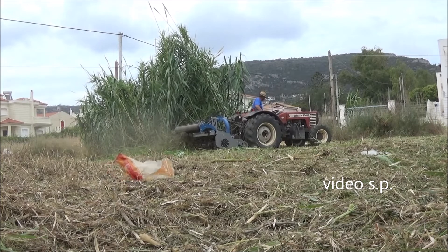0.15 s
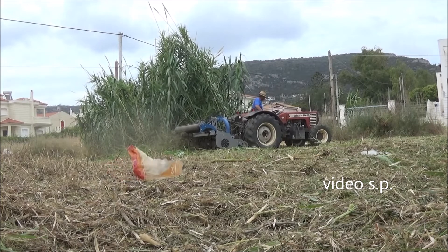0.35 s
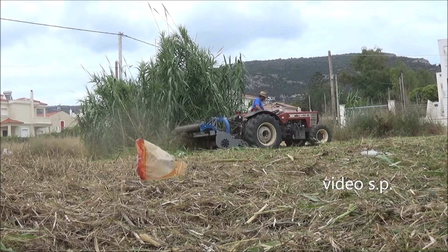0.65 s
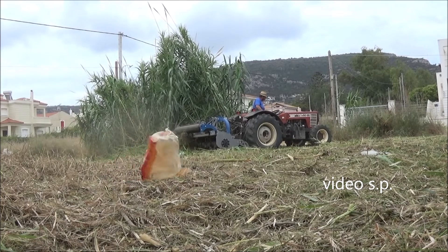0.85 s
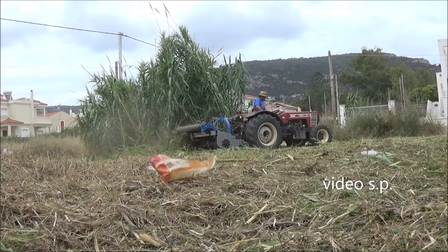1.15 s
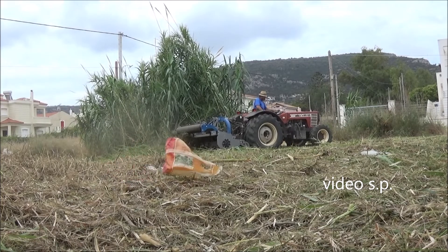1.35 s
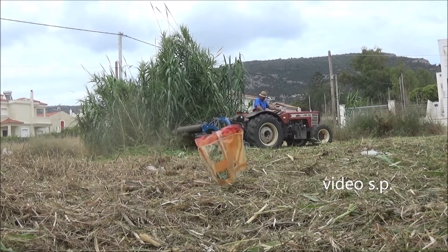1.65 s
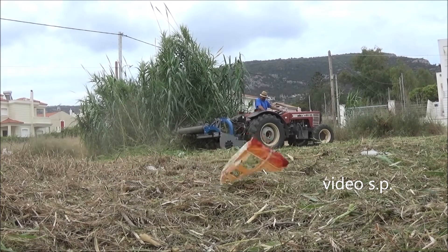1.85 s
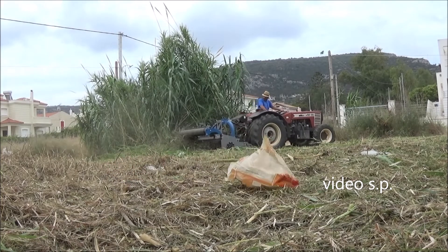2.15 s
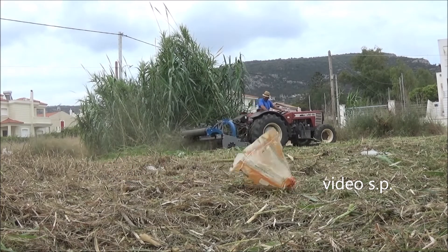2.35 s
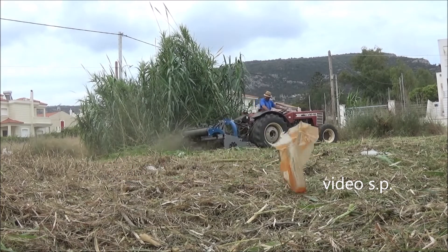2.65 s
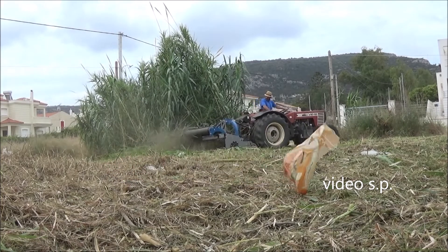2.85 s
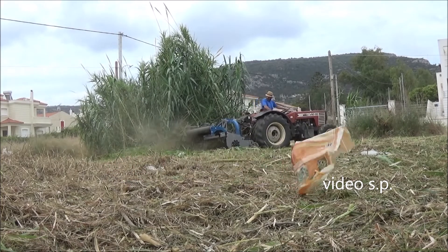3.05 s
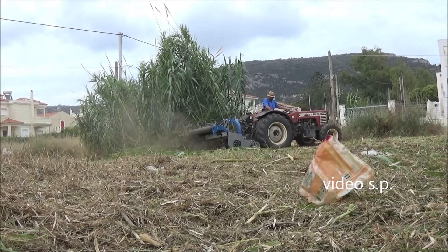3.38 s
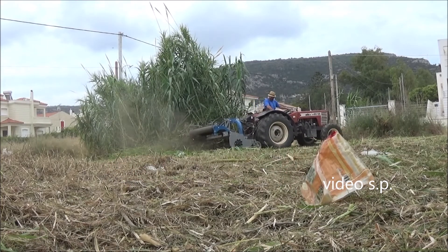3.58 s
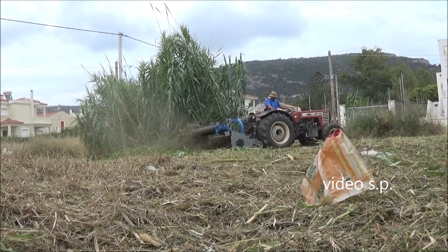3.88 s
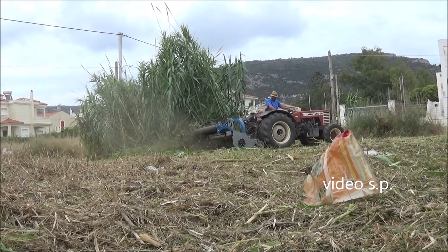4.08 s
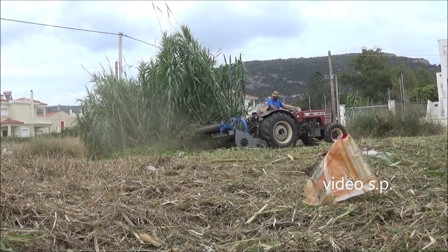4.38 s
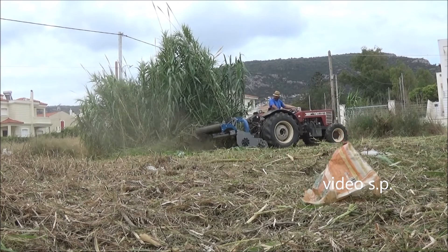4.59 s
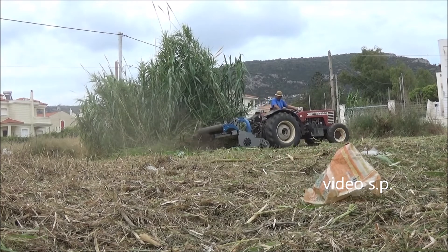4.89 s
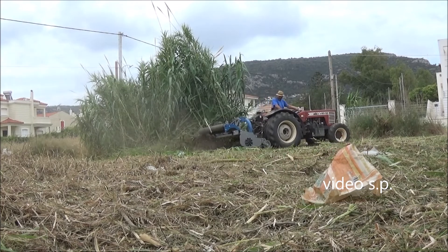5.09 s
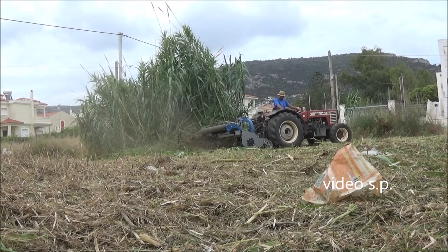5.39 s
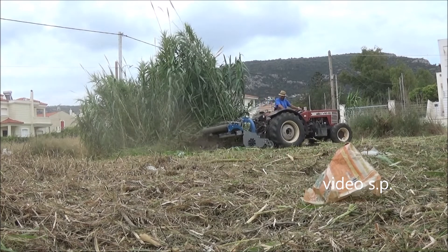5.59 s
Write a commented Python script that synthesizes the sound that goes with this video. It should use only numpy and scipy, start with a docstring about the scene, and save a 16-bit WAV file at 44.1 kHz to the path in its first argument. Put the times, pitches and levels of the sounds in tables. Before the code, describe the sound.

A tractor-driven mulcher shreds reeds with a bright, dense hiss and sharp cracks over a low diesel rumble outdoors.

```python
"""Reeds tick, swish and crack in a flail mulcher, over the rumble of a diesel tractor across an open field.
Half empty, the rotor ticks once a turn and sweeps through a few stalks; then it bites in, the engine sags
and countless snapping fibres merge into a bright hiss. Thick canes crack, hollow stalks resonate, and the
exhaust puffs with each firing. The camera's limiter ducks after the hardest cracks."""
import sys
import numpy as np
from scipy import signal
from scipy.fft import rfft, irfft
from scipy.io import wavfile
from scipy.ndimage import uniform_filter1d, minimum_filter1d

SR = 44100
rng = np.random.default_rng(int(sys.argv[2]) if len(sys.argv) > 2 else 0)


def transcribe(signal):
    """Save signal, clipped to [-1, 1], as a 16-bit WAV file at the path in sys.argv[1]."""
    frames = np.atleast_2d(signal).T
    limited = np.clip(frames, -1, 1)
    pcm = np.round(limited * 32767).astype(np.int16)
    wavfile.write(sys.argv[1], SR, pcm)


N = 252693
TIME = np.arange(N) / SR

# spectrum of a dry splinter: frequency_hz, gain_db
SPLINTER_SPECTRUM = [(1500, -42.5), (3000, -14.5), (5000, -9.5), (9500, 3), (13000, -4), (15800, -19.5)]


def mulcher(turns):
    """Amplitude modulation: flails shred leaves and stems in surges that follow the rotor."""
    # the cut swells with each clump of reeds: time_s, leaf_level_db, stem_level_db
    cut_levels = [(0.0, -17.0, -29), (0.55, -18, -28.5), (0.95, -19, -27.0), (1.4, -19.5, -26.5),
                  (1.72, -16.5, -27.0), (1.85, -9, -27), (2.15, -12.5, -29), (2.6, -13, -28.5),
                  (2.92, -13.5, -29.5), (3.1, -15.5, -31.5), (3.45, -13.5, -29.0), (4.05, -12.5, -30.0),
                  (4.24, -14.5, -34), (4.4, -12.5, -29.5), (4.75, -12, -29.5), (4.97, -14.0, -34.5),
                  (5.2, -13.5, -29.5), (5.73, -12.5, -33.0)]
    leaf_db, stem_db = curves(cut_levels)
    filling_s, full_s = 1.35, 1.9
    emptiness = np.clip((full_s - TIME) / (full_s - filling_s), 0, 1)
    # a half-empty rotor swishes every second turn, throbs every turn and lets splinters stand out
    swish_db = 8.5 * emptiness * bump(turns, centre=1.13, width=0.11, period=2)
    throb_db = 2 * emptiness * np.cos(2 * np.pi * (turns - 0.68))
    crackle_db = -10 + 2 * emptiness
    surge = undb(swish_db + throb_db) * bites(per_second=110, decay_s=0.0064, depth=1.63)
    leaves = undb(leaf_db + 0.18) * shredded_leaves(surge)
    stems = undb(stem_db + 5.5) * crunched_stems(surge)
    splinters = unit(colour(snaps(per_second=600, spread_db=1.55), SPLINTER_SPECTRUM))
    crackle = undb(leaf_db + crackle_db) * splinters
    return leaves + stems + crackle + flail_tick(turns) + undb(5) * hood_knocks()


def shredded_leaves(surge):
    """Shot noise: tearing leaves click and fuse into hiss, flickering independently in three bands."""
    # spectrum of tearing leaves: frequency_hz, gain_db
    leaf_spectrum = [(1500, -32.5), (3000, -11), (4200, -5), (4650, -8), (5100, -3), (5350, -6), (5650, -3),
                     (6200, -4.5), (6900, -6), (7800, -2.5), (9300, 1), (10500, -2), (12300, -7),
                     (15800, -20)]
    hiss = 0
    for band_hz in [(1500, 6800), (6800, 10500), (10500, 17000)]:
        fibres = snaps(per_second=19000, spread_db=3)
        envelope = steady(surge * bites(per_second=200, decay_s=0.0035, depth=1.3))
        band = signal.butter(4, band_hz, "band", fs=SR, output="sos")
        hiss += signal.sosfilt(band, fibres * envelope)
    return unit(colour(hiss, leaf_spectrum))


def crunched_stems(surge):
    """Filtered impulses: splitting stems crunch below the hiss and follow the surges more weakly."""
    # spectrum of splitting stems: frequency_hz, gain_db
    stem_spectrum = [(500, -26), (850, -16.5), (1100, -9), (1400, -4), (1950, 1), (2400, -1), (3000, 1),
                     (4000, -4), (5500, -4), (9000, -23)]
    splits = snaps(per_second=8000, spread_db=1.5)
    envelope = steady(surge ** 0.31 * bites(per_second=190, decay_s=0.0039, depth=1))
    return unit(colour(splits * envelope, stem_spectrum))


def flail_tick(turns):
    """Periodic impact: one flail ticks on every turn, growing louder until the reeds muffle it."""
    peak_s, rise_db_per_s, fall_db_per_s = 0.65, 19, 26
    strike_turns, decay_turns = 0.85, 0.041
    age = TIME - peak_s
    level_db = -3 + np.minimum(rise_db_per_s * age, -fall_db_per_s * age)
    since_strike = (turns - strike_turns) % 1
    tick = unit(noise(SPLINTER_SPECTRUM)) * np.exp(-since_strike / decay_turns)
    return undb(level_db + walk(26.6)) * tick


def hood_knocks():
    """Impact resonance: the half-empty rotor slaps canes against the hood; it rings and splinters spray."""
    # slaps in step with the rotor: time_s, relative_peak_db
    slaps = [(0.5057, -16), (0.7791, -22), (0.853, -13), (1.1478, -10), (1.2171, -12), (1.2965, -9),
             (1.3667, -10), (1.4414, -18), (1.5918, -13), (1.6611, -15), (1.7345, -13)]
    hood_hz, width_s = 3160, 0.0033
    hood = signal.iirpeak(hood_hz, Q=3.3, fs=SR)
    impacts = snaps(per_second=8400, spread_db=0)
    ring = unit(signal.lfilter(*hood, signal.lfilter(*hood, impacts)))
    spray = undb(-1.5) * unit(noise(SPLINTER_SPECTRUM))
    sound = 0
    for time_s, peak_db in slaps:
        knock = (ring + spray) * np.exp(-0.5 * ((TIME - time_s) / width_s) ** 2)
        sound += undb(peak_db) * knock / np.abs(knock).max()
    return sound


def canes():
    """Brittle fracture: thick canes break in short broadband bursts, among the rasps of hollow stalks."""
    # struck stalks and clods: start_s, pitch_hz, bandwidth_hz, decay_s, level_db
    rasps = [(0.53, 4280, 2500, 0.056, -16), (1.825, 9000, 500, 0.067, -25), (1.862, 2020, 200, 0.028, -16),
             (1.999, 3470, 1400, 0.073, -17), (2.249, 4260, 400, 0.013, -15),
             (2.286, 5600, 600, 0.041, -12.5), (2.329, 380, 400, 0.0073, -26),
             (2.576, 2810, 450, 0.036, -13.5), (2.59, 1950, 300, 0.03, -27), (2.631, 8000, 7000, .025, -8),
             (2.639, 4480, 1500, 0.026, -14), (3.192, 5900, 900, 0.03, -17), (3.67, 5430, 600, .05, -18.5),
             (3.788, 5540, 600, 0.041, -16), (4.705, 5400, 1200, 0.07, -19), (4.772, 5300, 500, 0.03, -9.5),
             (5.234, 2970, 900, 0.016, -17.5)]
    # thick canes breaking: start_s, peak_db
    cracks = [(1.974, 3.5), (2.487, -3), (3.053, 4), (3.14, 2.5), (3.181, 0.5), (3.287, 5), (3.438, 0.5),
              (3.603, 0.5), (3.86, 4.5), (4.244, 0), (4.582, 1), (4.656, 3), (4.825, 2), (4.955, 4),
              (5.044, 3), (5.114, 4), (5.261, -3), (5.567, 1.5)]
    crack_decay_s = 0.0017
    sound = sum(rasp(*row) for row in rasps)
    splinter = noise(SPLINTER_SPECTRUM)
    for start_s, peak_db in cracks:
        age = TIME - start_s
        burst = splinter * (age >= 0) * np.exp(-np.abs(age) / crack_decay_s)
        sound += undb(peak_db) * burst / np.abs(burst).max()
    return sound


def rasp(start_s, pitch_hz, bandwidth_hz, decay_s, level_db):
    """Noise-driven resonance: the fibres of a struck stalk rattle out at its own pitch."""
    age, rise_s = TIME[:SR // 4], 0.00026
    stalk = signal.iirpeak(pitch_hz, pitch_hz / bandwidth_hz, fs=SR)
    ring = unit(signal.lfilter(*stalk, rng.standard_normal(len(age))))
    envelope = np.exp(-age / decay_s) * (1 - np.exp(-age / rise_s))
    return np.pad(undb(level_db) * ring * envelope, (int(start_s * SR), N))[:N]


def tractor(turns):
    """Engine orders: two firings a crank turn puff from the exhaust; the block drones and gears whine."""
    # level as heard, ducked by the camera when the hiss swells: time_s, rumble_level_db, hum_level_db
    heard_levels = [(0.0, -34.5, -40), (1.1, -29.5, -36.5), (1.7, -30.0, -38), (1.92, -34.5, -44),
                    (2.25, -36.5, -47), (2.45, -35.5, -45), (3.2, -36, -37), (3.35, -36, -43),
                    (3.7, -35, -42), (4.42, -39.5, -53), (4.6, -35, -43.5), (4.9, -41.5, -52),
                    (5.2, -39, -49.5), (5.73, -38, -50)]
    # spectrum of the exhaust puffs: frequency_hz, gain_db
    rumble_spectrum = [(18, -42), (30, -17), (65, -13), (85, -6), (102, -6), (128, -7), (152, -2.5),
                       (310, -2.5), (394, -6.5), (442, -3), (532, -10), (717, -13), (900, -20.5),
                       (1170, -42), (1980, -120)]
    # exhaust tones: crank_order, relative_level_db
    exhaust_orders = [(2, -22), (5, -11.5), (9, -19), (9.5, -6), (10, -8), (11, -8), (11.5, -6.5), (12, -6),
                      (12.5, -3), (13, -10), (14, -4)]
    # gear and fan tones: crank_order, relative_level_db
    whine_orders = [(17, -9.5), (19.5, -16), (22, -21), (42, -9.5), (52, -8), (55, -6)]
    # block tones at a steady mean level: crank_order, relative_level_db
    drone_orders = [(6, 2), (7, -11), (8, 2.5), (28, -4)]
    rumble_db, hum_db = curves(heard_levels)
    firings = 2 * turns
    puff_db = 2.3 * bump(firings, centre=0, width=0.32, period=1)
    puffs = colour(undb(puff_db) * rng.standard_normal(N), rumble_spectrum)
    silencer = signal.butter(2, 125, "high", fs=SR, output="sos")
    rumble = undb(-0.25) * unit(signal.sosfilt(silencer, puffs))
    exhaust = undb(-6.5) * shaft_tones(turns, exhaust_orders, waver_db=1.5, wander_rad=0.21)
    whine = undb(-8) * shaft_tones(turns, whine_orders, waver_db=3, wander_rad=0.56)
    drone = undb(-44.5) * shaft_tones(turns, drone_orders, waver_db=3.5, wander_rad=0.26)
    hum = undb(hum_db) * unit(np.sin(2 * np.pi * 2 * firings))  # second harmonic of the firing rate
    return undb(rumble_db) * (rumble + exhaust + whine) + drone + hum


def shaft_tones(turns, orders, waver_db, wander_rad):
    """Phase locking: tones at multiples of a shaft's speed, each wavering a little in level and phase."""
    tones = 0
    for order, level_db in orders:
        gain = undb(level_db + waver_db * walk(9))
        phase = 2 * np.pi * (order * turns + rng.random())
        tones += gain * np.sin(phase + wander_rad * walk(13))
    return unit(tones)


def field(direct):
    """Scattering: ground and hedges spread a little sound to the sides, over faint low air noise."""
    # stereo width: frequency_hz, side_minus_mid_db
    side_spectrum = [(60, -39), (250, -36), (1000, -20.5), (2000, -17), (4500, -22), (8000, -13.5),
                     (12000, -58)]
    age, decay_s = TIME[:SR // 10], 0.0067
    echoes = rng.standard_normal(len(age)) * np.exp(-age / decay_s)
    scattered = signal.fftconvolve(direct, echoes / np.linalg.norm(echoes))[:N]
    side = colour(scattered, side_spectrum)
    air = undb(-64) * unit(noise([(15, -6), (40, -10), (75, 0), (200, -6), (2000, -41)]))
    return direct + air + side * np.array([[1], [-1]])


def snaps(per_second, spread_db):
    """Poisson process: fibres break in clicks at random moments, many small and a few large."""
    happens = rng.random(N) < per_second / SR
    size = undb(spread_db * np.minimum(rng.exponential(size=N), 5))
    return unit(happens * size * rng.choice([-1, 1], N))


def bites(per_second, decay_s, depth):
    """Powers add: each stalk that meets the flails gives a sudden surge that decays exponentially."""
    starts = (rng.random(N) < per_second / SR) * rng.uniform(0.12, 1, N)
    power = signal.lfilter([1], [1, -np.exp(-1 / (decay_s * SR))], starts)
    return np.sqrt(1 + depth * power)


def steady(surge):
    """Division by the running rms keeps quick surges and evens out slow ones."""
    return surge / np.sqrt(uniform_filter1d(surge ** 2, SR // 7))


def colour(x, spectrum):
    """Minimum-phase filter with the response given as rows of frequency_hz, gain_db."""
    hz, db = np.transpose(spectrum)
    grid_hz = np.fft.rfftfreq(4096, 1 / SR)
    gain = undb(np.interp(np.log(grid_hz + 1), np.log(hz), db))
    cepstrum = irfft(np.log(gain))
    causal_fold = 1 + np.sign(np.fft.fftfreq(len(cepstrum)))
    impulse_response = irfft(np.exp(rfft(cepstrum * causal_fold)))
    return signal.fftconvolve(x, impulse_response)[:N]


def noise(spectrum):
    """White noise filtered to a spectrum."""
    return colour(rng.standard_normal(N), spectrum)


def walk(rate_hz):
    """Smooth random fluctuation of rms 1, changing course at about rate_hz."""
    hold = max(int(SR / rate_hz), 1)
    steps = rng.standard_normal(N)[np.arange(N) // hold]
    return unit(uniform_filter1d(steps, hold))


def bump(phase, centre, width, period):
    """A Gaussian pulse that returns every period."""
    offset = (phase - centre + period / 2) % period - period / 2
    return np.exp(-0.5 * (offset / width) ** 2)


def curves(table):
    """Linear interpolation of a table's columns over time."""
    time_s, *columns = np.transpose(table)
    return [np.interp(TIME, time_s, column) for column in columns]


def undb(db):
    """Decibels to amplitude gain."""
    return 10 ** (np.asarray(db) / 20)


def unit(x):
    """Scale to rms 1."""
    return x / np.sqrt(np.mean(x ** 2))


def limiter(x, ceiling_db, release_db_per_s):
    """Look-ahead limiting: the gain drops just before each peak over the ceiling and recovers steadily."""
    window = SR // 300
    level_db = 20 * np.log10(np.abs(x).max(axis=0) + 1e-9)
    excess_db = np.maximum(level_db - ceiling_db, 0)
    held_db = -minimum_filter1d(-excess_db, window)
    recovery_db = release_db_per_s * TIME
    cut_db = np.maximum.accumulate(held_db + recovery_db) - recovery_db
    return x * undb(-uniform_filter1d(cut_db, window))


def scene():
    """Rigid coupling: the engine drives the rotor through the power take-off, so both sag together."""
    # engine speed: time_s, crank_speed_hz
    crank_speed = [(0.0, 26.1), (0.8, 25.99), (1.6, 25.9), (1.9, 25.7), (2.2, 25.19), (2.5, 24.33),
                   (2.8, 24.14), (3.1, 24.17), (3.4, 24.96), (3.7, 25.19), (4.1, 25.27), (4.6, 25.11),
                   (5.1, 25.33), (5.73, 25.44)]
    rotor_ratio = 1.0416
    crank_turns = np.cumsum(curves(crank_speed)[0]) / SR
    return field(tractor(crank_turns) + mulcher(rotor_ratio * crank_turns) + canes())


def record(dry):
    """Peak and band limiting: the camera holds down the cracks and cuts the highest treble."""
    limited = limiter(dry, ceiling_db=-1.24, release_db_per_s=262)
    cutoff_hz = 15850
    return signal.sosfilt(signal.ellip(14, 0.1, 100, cutoff_hz, fs=SR, output="sos"), limited)


dry = scene()
out = record(dry)
transcribe(out)
```